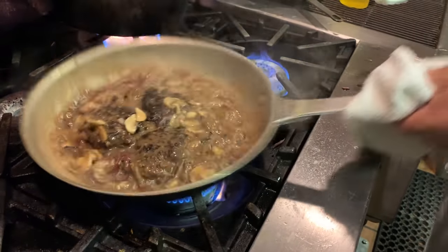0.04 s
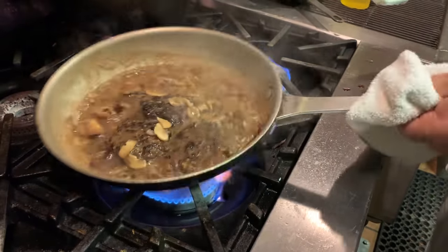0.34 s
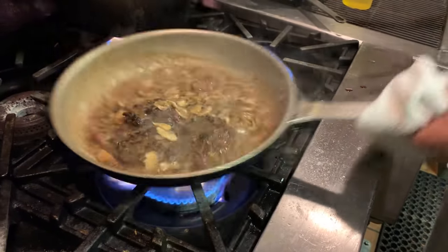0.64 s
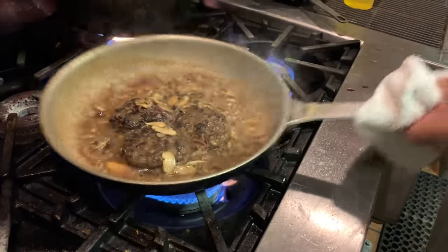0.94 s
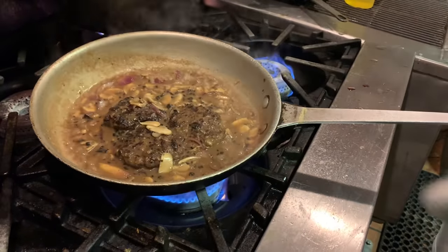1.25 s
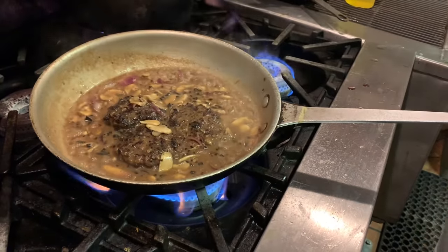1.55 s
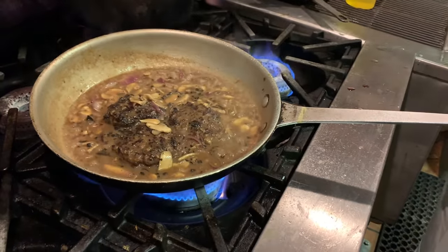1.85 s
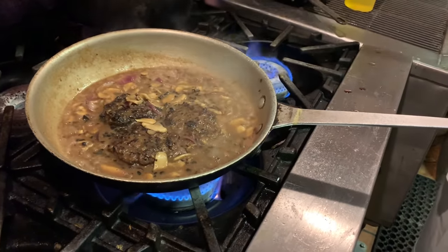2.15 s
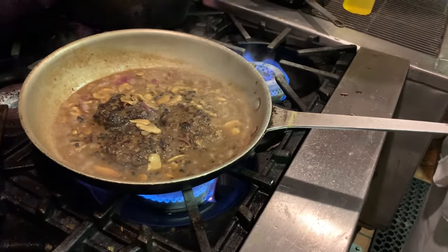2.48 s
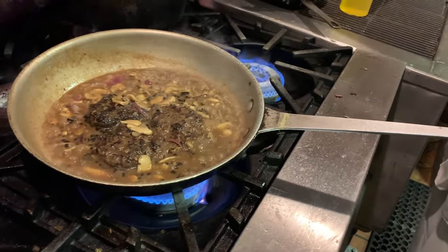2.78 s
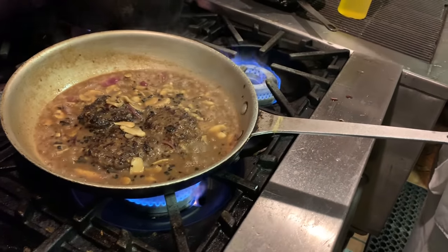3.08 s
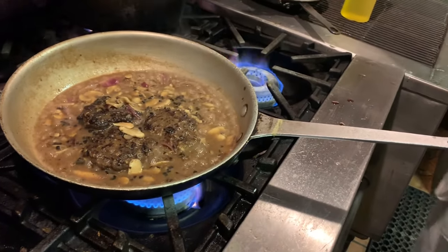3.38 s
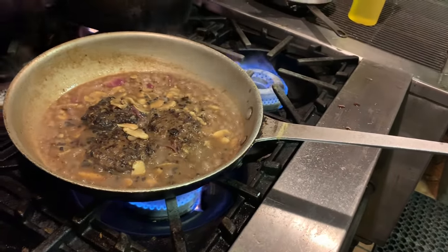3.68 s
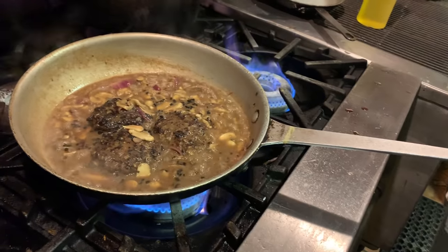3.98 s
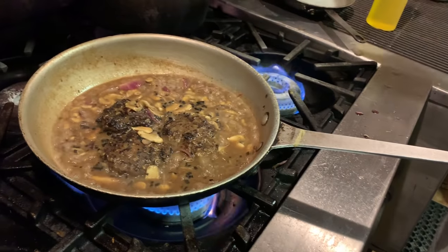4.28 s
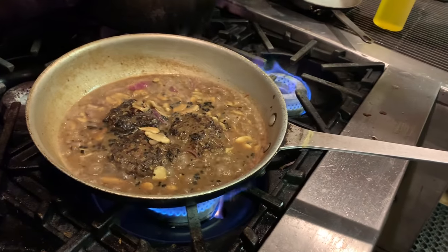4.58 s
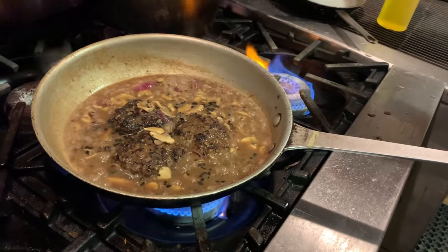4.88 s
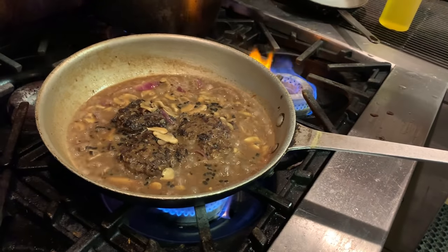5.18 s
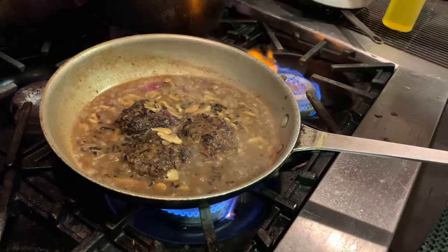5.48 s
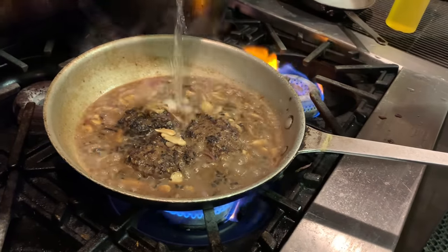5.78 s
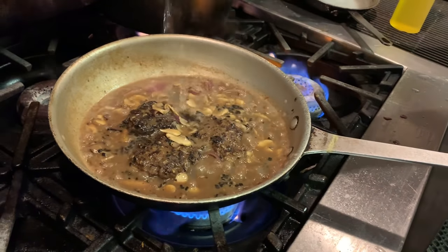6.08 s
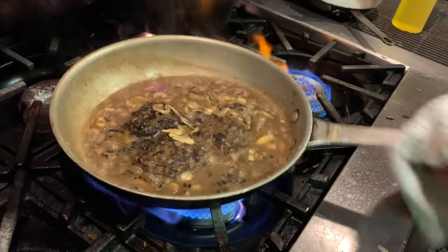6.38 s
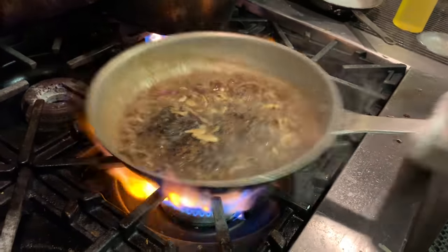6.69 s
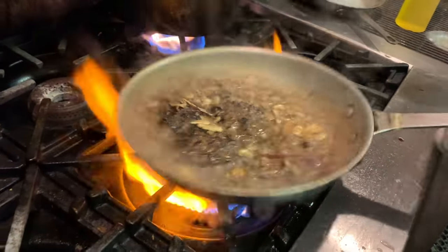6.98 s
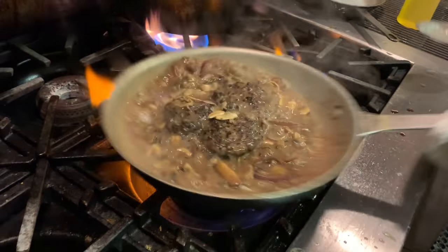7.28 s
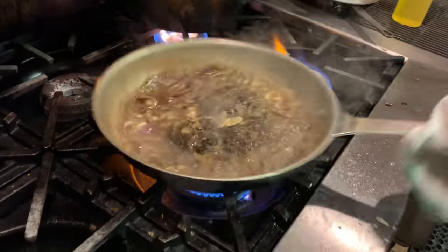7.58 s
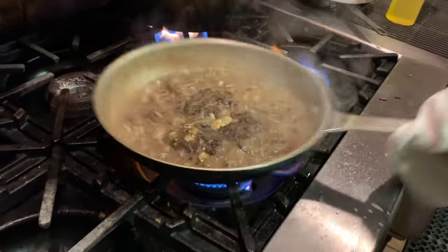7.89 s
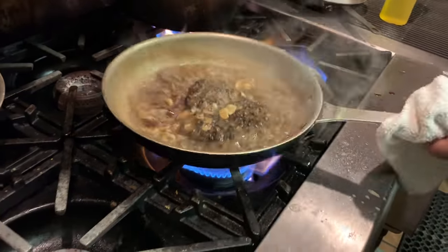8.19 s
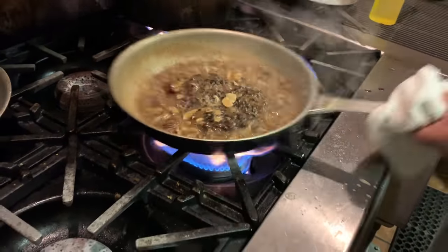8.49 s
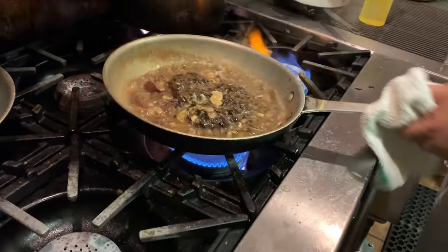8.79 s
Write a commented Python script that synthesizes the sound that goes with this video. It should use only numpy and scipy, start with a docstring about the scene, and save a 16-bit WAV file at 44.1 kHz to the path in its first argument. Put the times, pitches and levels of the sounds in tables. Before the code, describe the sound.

A pan grinds over a stove grate and sizzles while steel tongs clatter, under a droning kitchen extractor hood.

```python
"""Gravy on a restaurant range

An extractor hood drones throughout: air booms in its duct under the wavering tones of the fan.
A pan of gravy grinds and bumps over the iron grate, is left to bubble, then is swirled again.
Steel tongs scrape and clatter against a pan, ringing in the tiled kitchen. Hot fat fizzes
underneath, spits now and then, and surges, most of all in the second half."""
import sys
import numpy as np
from scipy import signal
from scipy.fft import rfft, irfft, next_fast_len
from scipy.io import wavfile

SR = 44100
rng = np.random.default_rng(int(sys.argv[2]) if len(sys.argv) > 2 else 0)


def put_to_file(sound):
    """Save the sound as 16-bit audio at rate SR, in the file named by the first command-line argument."""
    columns = np.atleast_2d(sound).T  # one column per channel
    safe = np.clip(columns, -1, 1)
    whole_steps = np.round(safe * 32767)
    wavfile.write(sys.argv[1], SR, whole_steps.astype(np.int16))


N = 399088
TIME = np.arange(N) / SR

# air rush of hood and burners: (frequency [Hz], level [dB per Hz])
AIR_COLOUR = [(18, -76), (30, -69), (60, -51), (110, -50), (205, -58.5), (310, -52), (420, -58), (590, -61),
              (850, -67), (1030, -69.5), (1400, -67), (2000, -77), (4200, -84.5), (9000, -99),
              (16000, -104)]
# boom of the duct: (resonance [Hz], width [Hz], level [dB per Hz])
DUCT_MODES = [(28, 10, -52), (52, 6.9, -44.5), (74.5, 13, -50), (160.6, 25.4, -36), (245.6, 19, -43),
              (286, 55, -47), (362.5, 8.8, -49.5), (459, 54, -55), (671.6, 70, -52.5), (869, 12, -60),
              (944, 26, -59.5), (1148, 28, -61.5), (1283, 48, -59)]
# stereo width of the air rush: (frequency [Hz], side minus mid [dB])
AIR_WIDTH = [(30, -27), (60, -44), (130, -17.5), (250, -16), (420, -11.5), (700, -0.5), (1300, -4.5),
             (2400, 1.5), (6000, 2)]
# lean of the air rush: (frequency [Hz], left minus right [dB])
AIR_LEAN = [(30, 4), (80, -0.5), (150, 2), (260, -0.5), (500, 0.5), (1200, 1.5), (2200, 1), (3500, 1.5),
            (5500, -3.5), (8000, 1)]
# level ride of the fan: (time [s], overtones [dB], blade tone [dB])
FAN_LEVELS = [(0.0, -28.5, -39), (0.88, -28, -30.5), (1.48, -38, -35), (1.71, -32, -31.5), (4.03, -31, -40),
              (4.28, -25, -34.5), (7.18, -27, -40), (8.42, -33, -32), (9.05, -33, -28)]
# fan tones: (harmonic of the blade rate, level [dB], left lead [rad], left minus right [dB])
FAN_TONES = [(1, 0, 0.56, -2.5), (2, -1.9, -0.025, 0.5), (3, -27, 0.28, 0), (4, -19.5, -0.59, 10)]
# liquid meeting the hot wall of the pan: (time [s], level [dB], rise [s], hold [s])
SURGES = [(-.05, -33.5, 0.026, 0.071), (0.564, -55, 0.024, .02), (4.577, -33, 0.022, 0.41),
          (5.635, -26, 0.017, 0.016), (6.3, -36, 0.069, 0.61), (7.27, -31.5, 0.086, 0.14)]
# colour of the sizzle: (frequency [Hz], relative level [dB])
SIZZLE_COLOUR = [(800, -39), (2000, -3), (3500, -4.5), (5800, -4.5), (7200, 0.5), (8600, 4), (10500, 2),
                 (12000, 4.5), (13500, 1.5), (16000, -1)]
# ring of the pan, damped by its gravy: (pitch [Hz], relative level [dB], t60 [s])
PAN_MODES = [(800, 3.5, 0.0058), (1075, 16, 0.039), (1147, 16, 0.039), (1366, 10, 0.016),
             (1590, 9.5, 0.023), (1760, 5.5, 0.011), (1970, 5, 0.013), (2700, -10.5, 0.011),
             (4000, -21.5, 0.0014)]
# strokes of the pan over the grate: (time [s], length [s], level [dB])
SWIRLS = [(0.023, 0.28, -32.5), (0.392, 0.33, -33.5), (0.679, .2, -38), (6.574, 0.41, -37),
          (6.87, 0.3, -34.5), (7.269, 0.29, -35), (7.541, 0.17, -36), (7.757, 0.27, -43), (7.997, 0.2, -37),
          (8.184, 0.37, -33.5)]
# pan bumping the grate, a hard edge brighter than the flat base:
# (time [s], level [dB], contact decay [s], brightness [dB per octave])
KNOCKS = [(0.074, -18, .006, -9), (0.088, -20, .011, -8), (0.153, -22.5, .005, 0), (0.165, -24, 0.0045, -2),
          (0.196, -14, 0.0018, -3), (0.251, -17.5, 0.0099, 12.5), (0.319, -21.5, .005, -11),
          (0.4347, -19, .005, 6), (0.478, -17.5, 0.011, -16), (0.493, -29, .006, -4), (0.553, -23, .003, 2),
          (0.597, -23, 0.0051, 12), (0.7883, -18, 0.0063, -3), (0.843, -18.5, 0.0018, 8),
          (6.614, -17.5, 0.0022, -7), (6.7085, -17.5, 0.011, -5), (6.755, -32, .007, 2),
          (6.803, -22, .007, -6), (6.916, -18, 0.012, 9), (6.9414, -19.5, 0.0057, 0),
          (6.972, -11, 0.0031, 9), (7.011, -21, .005, -10), (7.053, -20, .01, 10), (7.091, -24, 0.013, -8),
          (7.135, -24, 0.011, -17), (7.317, -23, 0.0069, 8), (7.355, -17, 0.0028, 3), (7.44, -29, .009, 7),
          (7.6, -23, 0.0053, 2), (7.653, -20, 0.01, 4), (7.688, -23, 0.0075, 4), (7.805, -24, .006, -2),
          (7.827, -21, .007, -3), (7.9208, -24, 0.0045, -17), (8.038, -23, 0.0046, -2),
          (8.0993, -16, 0.02, 4), (8.315, -20, 0.0073, 1), (8.365, -22, .006, 13), (8.424, -22, .008, 4),
          (8.447, -23, .008, 5), (9.022, -18, 0.0023, 8)]
# steel dragged over steel: (time [s], level [dB], swell [s], fade [s], centre [Hz])
SCRAPES = [(0.412, -35, .004, 0.037, 5800), (0.62, -26, 0.0037, 0.013, 5200),
           (0.63, -34.5, .004, 0.1, 4460), (0.631, -42, .004, 0.084, 3020), (2.872, -42, .015, .025, 7500),
           (2.916, -28.5, .006, 0.011, 7200), (3.62, -35, 0.083, 0.036, 2120),
           (3.625, -37.5, .12, .04, 7750), (8.187, -27.5, 0.0044, 0.046, 2950)]
# tongs striking steel: (time [s], level [dB], rattle length [s], brightness [dB per octave],
# wall clonk [dB], rim clank [dB], reverb send [dB], favoured ring [Hz])
CLINKS = [(0.621, -26, 0.079, -5.5, 6, -3, 5.5, 5200), (1.1804, -12.5, 0.0099, 3, 2, 3, 3.5, 6900),
          (1.21, -14, 0.035, 0, 4, -3, 0.5, 4380), (1.246, -16.5, 0.05, 0.1, 4, 1, 1.5, 8320),
          (1.361, -27.5, .03, -2, 0, 4, 7, 8300), (1.394, -16, 0.022, 0.5, -2, -2, 4, 8350),
          (1.469, -12, 0.012, 2.5, 9, 7, 2, 6500), (1.531, -13, 0.018, 0.5, 4, 4, 0.5, 6820),
          (1.588, -12.5, 0.054, 1.3, 9.5, 1, 2, 1045), (1.673, -24, .03, -0.5, 0, 6, 4, 6850),
          (1.784, -19.5, 0.02, -1.5, 3, 2, 3.5, 7200), (1.866, -17, 0.025, 1, -1, 4, 3, 8280),
          (1.896, -24, .025, -1, 2, 2, 4, 8280), (1.923, -13.5, 0.045, 1.2, 8, 3, 1, 2060),
          (1.997, -14, 0.031, 1, 6, 1, 4.5, 1930), (2.035, -14.5, 0.041, 0, 2, -2, 3, 1950),
          (2.082, -19.5, 0.054, -0.5, 5, -2, 3.5, 7390), (2.92, -25.5, 0.023, -2.5, -4, -5, 0.5, 3900),
          (3.066, -30, 0.023, -3, -7, -6, 6, 7390), (3.087, -13.5, 0.026, 1.5, -14, -2, 6.5, 2200),
          (3.106, -17, 0.097, 0, 1, 2.5, -0.5, 5860), (3.369, -26.5, 0.033, 2.5, -2, 6, 3, 7390),
          (3.4207, -23.5, 0.009, -1.5, 3, 5, 4, 6550), (3.73, -27.5, 0.035, -3, -5, 6, 5, 7080),
          (3.752, -26, 0.12, 1, -2, 2, 3.5, 7080), (3.849, -14, 0.026, -3, 3, 7, -3, 2080),
          (3.923, -27, 0.013, -3.5, 7, -7, 5, 8300), (3.978, -16.5, 0.0024, 2.5, 0, 5, 0.5, 9280),
          (8.179, -15.5, 0.052, 1.2, 9.5, 2, 4, 6560), (8.226, -17.5, 0.043, 4, 1, 2, 4, 6990),
          (8.257, -23.5, 0.1, -.5, -6, 5, 3, 7010), (8.325, -23, 0.042, -6.5, 0, -2, 0, 8310),
          (8.357, -29, 0.09, 0, -1, -2, 2.5, 1570), (8.468, -21.5, 0.02, -1, 5, 0, 4.5, 7120)]
# ring of tongs and pan: (pitch [Hz], relative level [dB], t60 [s])
STEEL_MODES = [(890, -7, 0.074), (1045, 3.5, 0.11), (1570, 5, 0.06), (1930, -2.5, 0.025),
               (2196, 0.5, 0.037), (2780, 1, 0.047), (3350, -1, 0.043), (3876, -1, 0.028), (4380, -3, .04),
               (4700, -0.5, .05), (5200, -2, 0.03), (5850, 1, 0.046), (6560, 2, 0.062), (6870, 0, .11),
               (7080, -6, .09), (7390, -9, .07), (8310, 0.5, .04), (9280, -7, .04)]
# colour of a steel contact: (frequency [Hz], relative level [dB])
STEEL_COLOUR = [(200, 1), (600, -4.5), (1000, 0.5), (1270, 2), (1550, -0.5), (2150, 1), (2800, -4),
                (3900, -1.5), (4900, -4), (5700, -2.5), (6700, 3.5), (8500, 3), (11000, 8.5), (13500, -2),
                (16000, -4)]
# lean of the clatter: (frequency [Hz], left minus right [dB])
STEEL_LEAN = [(700, 0.5), (2000, 2), (3200, 0.5), (4800, 0.5), (5700, -6), (7200, 2)]
# fat spitting: (time [s], level [dB])
SPITS = [(1.1491, -6), (2.2294, -13), (3.02, -6), (6.9727, 3.5), (7.2326, 6), (7.686, -13)]
# kitchen reverb: (frequency [Hz], t60 [s])
KITCHEN_T60 = [(300, 0.28), (2000, 0.42), (5000, 0.47), (9000, 0.14), (15000, 0.089)]
# phase of the top treble: (frequency [Hz], left lag [rad])
LEFT_LAG = [(7000, -.1), (8100, .1), (9000, 1.3), (9900, 2.95), (10900, 3.25), (11900, 4.4), (12900, 6.1),
            (14600, 6.4), (15500, 8.4)]


def from_db(db):
    """Decibels to gain."""
    return 10 ** (np.asarray(db) / 20)


def rms_one(x):
    """Scale to rms 1."""
    return x / np.sqrt(np.mean(x ** 2) + 1e-20)


def lean(db):
    """Left and right gains, the left louder by db."""
    return from_db(db * np.array([[.5], [-.5]]))


def bins(size):
    """Frequencies of a spectrum of that many samples."""
    return np.maximum(np.fft.rfftfreq(size, 1 / SR), 1)


def at_hz(points, hz):
    """Read a table along log frequency."""
    f, value = np.transpose(points)
    return np.interp(np.log(hz), np.log(f), value)


def filtered(x, response):
    """Pass x through a response given as a function of frequency."""
    size = next_fast_len(N + SR)
    return irfft(rfft(x, size) * response(bins(size)), size)[..., :N]


def drift(rate_hz):
    """A smooth random wander with rms 1."""
    hop = 100
    pole = np.exp(-2 * np.pi * rate_hz * hop / SR)
    slow = signal.lfilter([1], [1, -2 * pole, pole * pole], rng.standard_normal(N // hop + 1002))[1000:]
    return np.interp(np.arange(N) / hop, np.arange(len(slow)), rms_one(slow))


def ring(x, hz, t60):
    """A resonance with gain 1 at its top."""
    r, w = from_db(-60 / (t60 * SR)), 2 * np.pi * hz / SR
    return signal.lfilter(np.array([1, 0, -1]) * (1 - r * r) / 2, [1, -2 * r * np.cos(w), r * r], x + 1e-18)


def grains(per_s, spread_db, size=N):
    """Random clicks of uneven size and sign."""
    sizes = from_db(spread_db * np.minimum(rng.exponential(1, size), 4))
    return (rng.random(size) < per_s / SR) * sizes * rng.choice([-1, 1], size)


def add(track, s, sound):
    """Mix a sound in at time s."""
    start = max(round(s * SR), 0)
    track[..., start:start + sound.shape[-1]] += sound[..., :N - start]


def kitchen(x, wet_db, build_s=0.00021):
    """Direct sound plus a diffuse stereo tail off steel and tile, fresh for each spot that sounds."""
    t, tail = TIME[:SR * 2 // 5], 0
    edges_hz = np.geomspace(150, 18000, 9)
    for low, high in zip(edges_hz, edges_hz[1:]):
        band = signal.butter(2, [low, high], "band", fs=SR, output="sos")
        decay = from_db(-60 * t / at_hz(KITCHEN_T60, np.sqrt(low * high)))
        tail = tail + signal.sosfilt(band, rng.standard_normal((2, len(t)))) * decay
    tail = rms_one(tail * (1 - np.exp(-t / build_s))) / np.sqrt(len(t))
    return x + from_db(wet_db) * signal.fftconvolve(x[None], tail, axes=1)[:, :len(x)]


def hood():
    """Turbulent air booms in the duct's resonances; the bass sits near the centre, the top is wide."""
    def colour(f):
        duct = sum(from_db(db) ** 2 / (1 + (2 * (f - hz) / width) ** 2) ** 2
                   for hz, width, db in DUCT_MODES)
        return np.sqrt((from_db(at_hz(AIR_COLOUR, f)) ** 2 + duct) * SR / 2)
    mid, side = filtered(rng.standard_normal((2, N)), colour)
    side = filtered(side, lambda f: from_db(at_hz(AIR_WIDTH, f)))
    return filtered(np.array([mid + side, mid - side]), lambda f: lean(at_hz(AIR_LEAN, f)))


def fan(blade_hz=319.25, waver_hz=0.623, flutter_db=0.98, motor_hz=119.4, motor_db=-33):
    """Blade tones flutter in the uneven inflow, over the motor's mains hum."""
    times, overtones_db, blade_db = np.transpose(FAN_LEVELS)
    phase = 2 * np.pi * np.cumsum(blade_hz + waver_hz * drift(3.76)) / SR
    out = from_db(motor_db + drift(1.0)) * np.sin(2 * np.pi * motor_hz * TIME + 0.12 * drift(3.3))
    for harmonic, tone_db, lead, lean_db in FAN_TONES:
        ride_db = np.interp(TIME, times, blade_db if harmonic == 1 else overtones_db)
        gain = from_db(ride_db + tone_db + flutter_db * drift(0.91)) * lean(lean_db)
        out = out + gain * np.sin(harmonic * phase + np.array([[lead], [0]]))
    return np.sqrt(2) * out


def boiling_off(simmer_db=-45.5, fade_db_per_s=9.5):
    """Envelope of the sizzle: over a steady simmer, each surge rises, holds and fades as it boils away."""
    power = from_db(simmer_db) ** 2
    for s, db, rise_s, hold_s in SURGES:
        t = TIME - s
        fade_db = fade_db_per_s * np.maximum(t - rise_s - hold_s, 0)
        power = power + (np.clip(t / rise_s, 0, 1) * from_db(db - fade_db)) ** 2
    return np.sqrt(power)


def sizzle(pops_per_s=14000, flicker_db=1.48):
    """Countless tiny steam bursts in hot fat blur into a flickering hiss."""
    pops = np.array([grains(pops_per_s, spread_db=1.9) for side in range(2)])
    hiss = rms_one(filtered(pops, lambda f: from_db(at_hz(SIZZLE_COLOUR, f))))
    return hiss * boiling_off() * from_db(flicker_db * drift(29))


def gravy(per_pitch_per_s=25, cycles=9, level_db=-49):
    """Bubbles burst softly in the thick sauce, each a short damped note."""
    bubbles = sum(ring(grains(per_pitch_per_s, spread_db=2.9), hz, cycles / hz) / hz
                  for hz in np.geomspace(700, 2600, num=12))
    return from_db(level_db) * rms_one(bubbles)


def pan_body(force, bright=0, slosh_shift=0.021, uneven_db=2):
    """The pan rings; shifting gravy and the point of contact detune and rebalance its modes."""
    pulse, response = signal.unit_impulse(SR // 8), 0
    for k, (hz, db, t60) in enumerate(PAN_MODES):
        detune, share = rng.standard_normal(2)
        gain = from_db(db + uneven_db * share + bright * np.log2(hz / PAN_MODES[0][0]))
        response = response + (-1) ** k * gain * ring(pulse, hz * (1 + slosh_shift * detune), t60)
    return signal.fftconvolve(force, response / np.linalg.norm(response))


def pan_on_grate(slips_per_s=800, jerk_db=0.5, slide_db=-2.3, grit_db=-13):
    """The base grinds over rough iron with a faint gritty hiss, and bumps over the bars."""
    out, t = np.zeros(N), TIME[:SR // 2]
    for s, length_s, db in SWIRLS:
        speed = np.sqrt(np.abs(np.sin(np.pi * np.minimum(t / length_s, 1))))
        pressure = speed * from_db(db + slide_db - jerk_db * drift(43)[:len(t)])
        slips = rms_one(grains(slips_per_s, spread_db=3, size=len(t)))
        add(out, s, pan_body(pressure * slips))
        grit = rms_one(ring(rng.standard_normal(len(t)), hz=4200, t60=0.0019))
        add(out, s, speed * from_db(db + grit_db) * grit)
    for s, db, decay_s, bright in KNOCKS:
        bump = pan_body(rng.standard_normal(len(t)) * np.exp(-t / decay_s), bright)
        add(out, s, from_db(db) * bump / np.abs(bump).max())
    return out


def scrapes(slips_per_s=5000, cycles=7, trim_db=-2):
    """Quick stick and slip along a steel edge excites one broad resonance."""
    out, t = np.zeros(N), TIME[:SR // 3]
    for s, db, swell_s, fade_s, hz in SCRAPES:
        swell = np.sqrt(np.minimum(t / swell_s, 1))
        fade = np.exp(-(np.maximum(t - swell_s, 0) / fade_s) ** 2)
        slips = grains(slips_per_s, spread_db=0.96, size=len(t))
        rasp = rms_one(ring(ring(slips, hz, cycles / hz), hz, cycles / hz))
        add(out, s, from_db(db + trim_db) * swell * fade * rasp)
    return out


def steel_body(force, bright, clonk_db, clank_db, favoured_hz, ring_db=1, uneven_db=3, grip_shift=0.0032):
    """Tongs and pan ring; the grip detunes and rebalances the modes, the struck spot favours one pitch."""
    f = bins(len(force))
    hz, mode_db, t60 = np.transpose(STEEL_MODES)[:, :, None]
    detune, share = rng.standard_normal((2, len(STEEL_MODES), 1))
    favour_db = 8 * np.exp(-((hz - favoured_hz) / 130) ** 2)
    strength = from_db(mode_db + ring_db + favour_db + uneven_db * share)
    modes = strength / (1 + 2j * np.pi * (f - hz * (1 + grip_shift * detune)) * t60 / np.log(1000))
    tilt_db = bright * np.log2(np.maximum(f, 2000) / 6000)
    wall_db = clonk_db * np.exp(-((f - 880) / 135) ** 2)
    rim_db = clank_db * np.exp(-((f - 1980) / 350) ** 2)
    body = (1 + modes.sum(axis=0)) * from_db(at_hz(STEEL_COLOUR, f) + tilt_db + wall_db + rim_db)
    body /= np.sqrt(np.mean(np.abs(body) ** 2))
    return irfft(rfft(force) * body)


def tongs(crack_s=0.01, rattle_db=-5, bite_s=0.00039, firm_db=-10.5, tick_db=-1, tick_s=0.0088):
    """Each strike cracks, chatters on as the arms rebound, and rings the steel into the room."""
    out, t = np.zeros((2, N)), TIME[:SR // 2]
    edge = signal.butter(2, 8000, "high", fs=SR, output="sos")
    for s, db, rattle_s, bright, clonk_db, clank_db, room_db, favoured_hz in CLINKS:
        crack = rng.standard_normal(len(t)) * np.exp(-t / crack_s)
        rattle = rms_one(grains(per_s=700, spread_db=3, size=len(t))) * np.exp(-(t / rattle_s) ** 2)
        bite = 1 - np.exp(-t / (bite_s * from_db(firm_db - db) ** 0.7))  # lighter hit, slower attack
        force = (crack + from_db(rattle_db) * rattle) * bite
        clink = steel_body(force, bright, clonk_db, clank_db, favoured_hz)
        # the first touch of a hard edge is the brightest
        tick = signal.sosfilt(edge, bite * rng.standard_normal(len(t)) * np.exp(-t / tick_s))
        strike = (clink + from_db(tick_db) * tick)[:SR * 2 // 5]
        add(out, s, from_db(db) * kitchen(strike, room_db))
    return out


def spits(decay_s=0.00054, trim_db=-6):
    """Single drops burst in the fat with a thin, sharp tick."""
    out, t = np.zeros(N), TIME[:SR // 20]
    for s, db in SPITS:
        add(out, s, from_db(db + trim_db) * rng.standard_normal(len(t)) * np.exp(-t / decay_s))
    return signal.sosfilt(signal.butter(4, 8200, "high", fs=SR, output="sos"), out)


def scene():
    """The pan is up close and a little left; the tongs sit further back, with more of the room."""
    stove = kitchen(pan_on_grate() + gravy() + spits(), wet_db=-3.5)
    clatter = tongs() + kitchen(scrapes(), wet_db=-4.5)
    clatter = filtered(clatter, lambda f: lean(at_hz(STEEL_LEAN, f)))
    return hood() + fan() + sizzle() + stove * lean(2.4) + clatter


def record(dry):
    """Both sides carry the right's top treble, a touch late on the left; soft clip, then a high cut."""
    shared_above_hz, ceiling, cutoff_hz = 6800, 0.9, 15800
    top = filtered(dry, lambda f: np.clip((f - shared_above_hz) / 400 + .5, 0, 1))
    late = filtered(top[1], lambda f: np.exp(-1j * at_hz(LEFT_LAG, f)))
    pair = np.array([dry[0] - top[0] + late, dry[1]])
    rounded = pair / (1 + (pair / ceiling) ** 6) ** (1 / 6)
    return signal.sosfilt(signal.ellip(12, .1, 80, cutoff_hz, fs=SR, output="sos"), rounded)


dry = scene()
out = record(dry)
put_to_file(out)
```